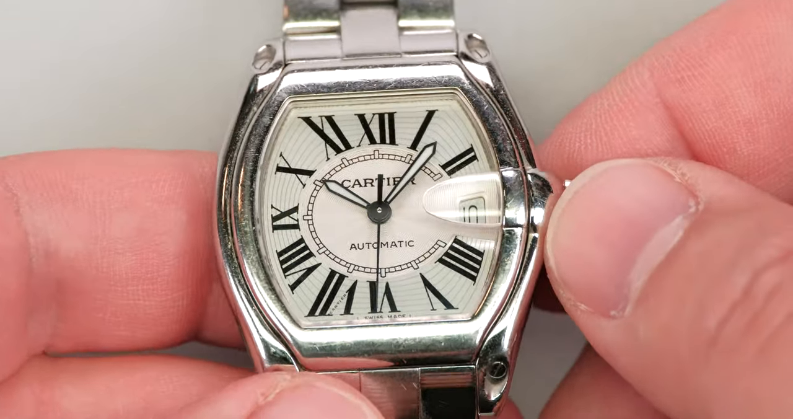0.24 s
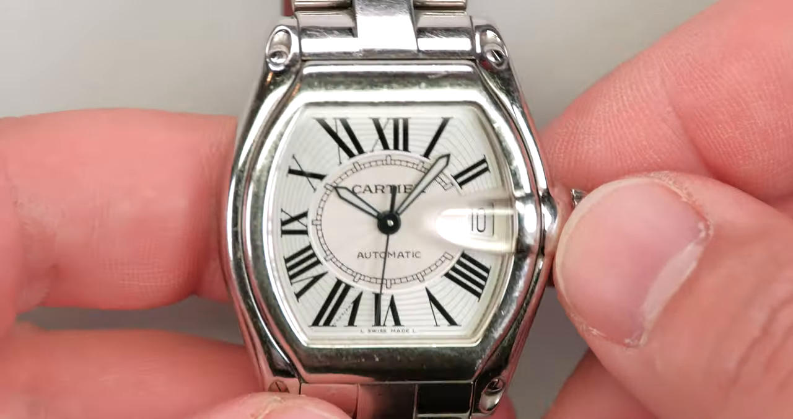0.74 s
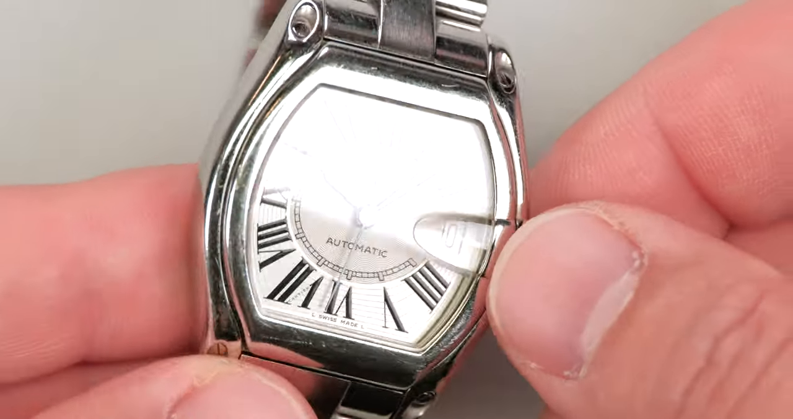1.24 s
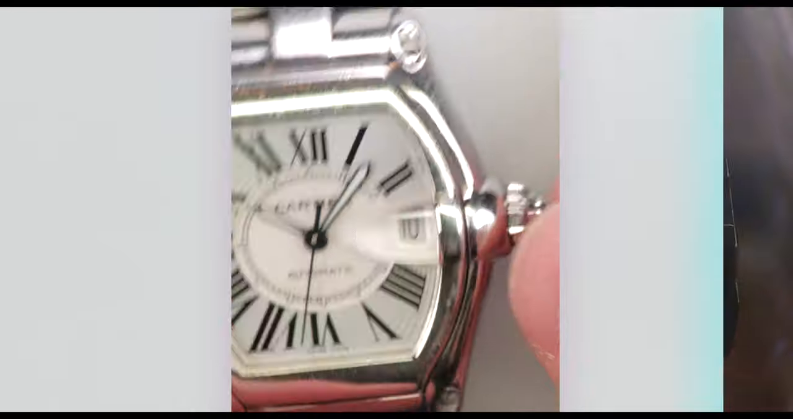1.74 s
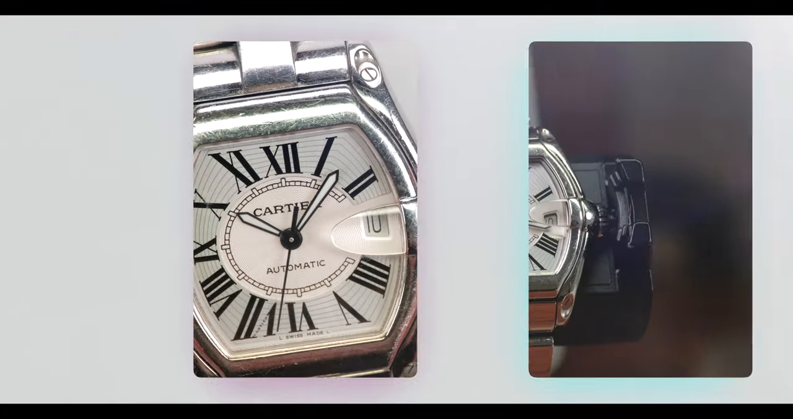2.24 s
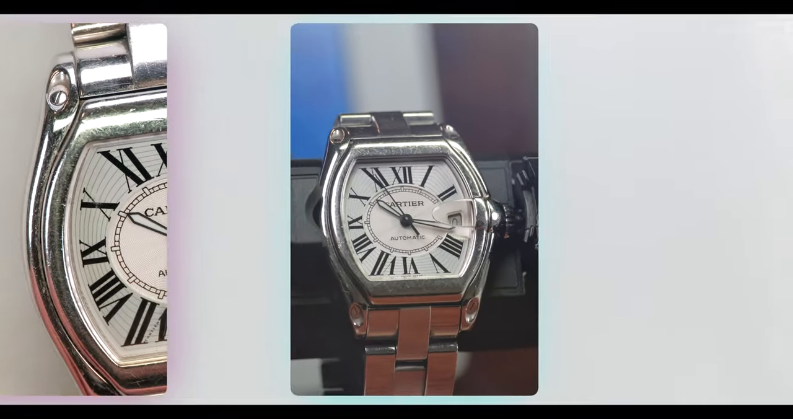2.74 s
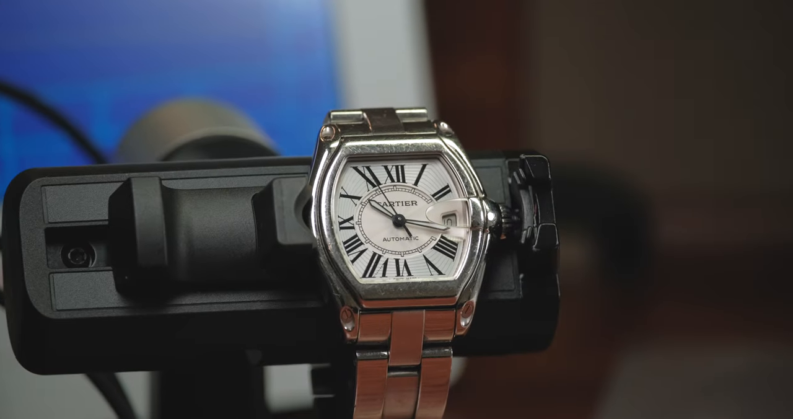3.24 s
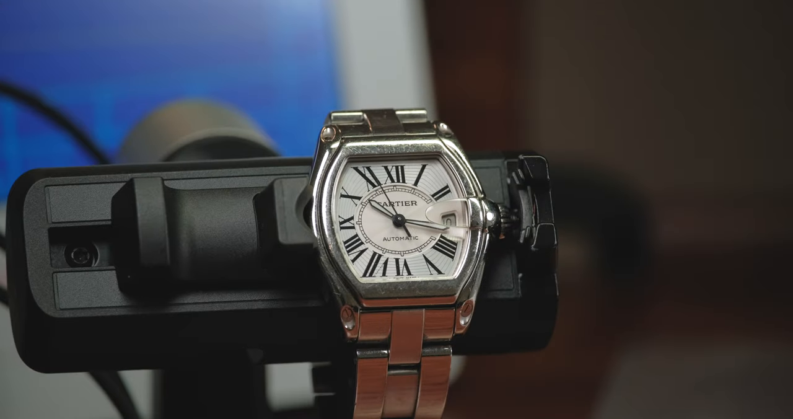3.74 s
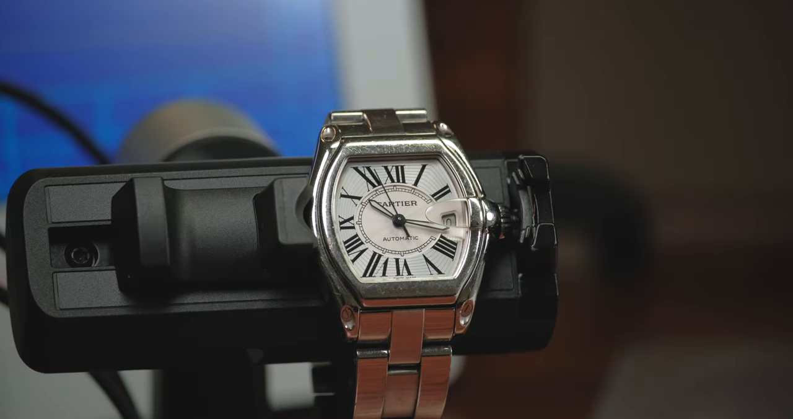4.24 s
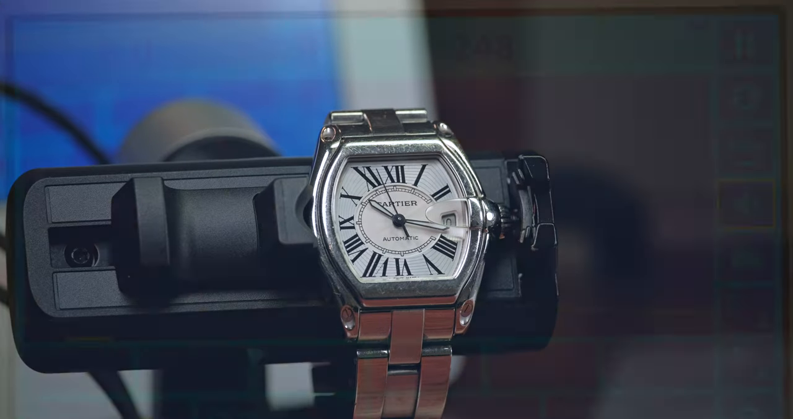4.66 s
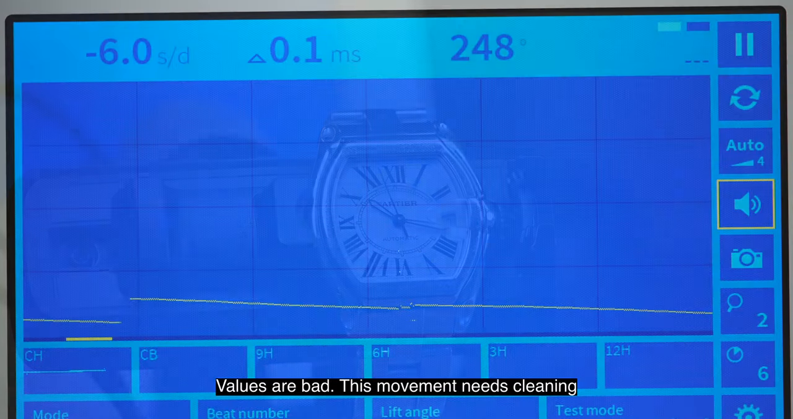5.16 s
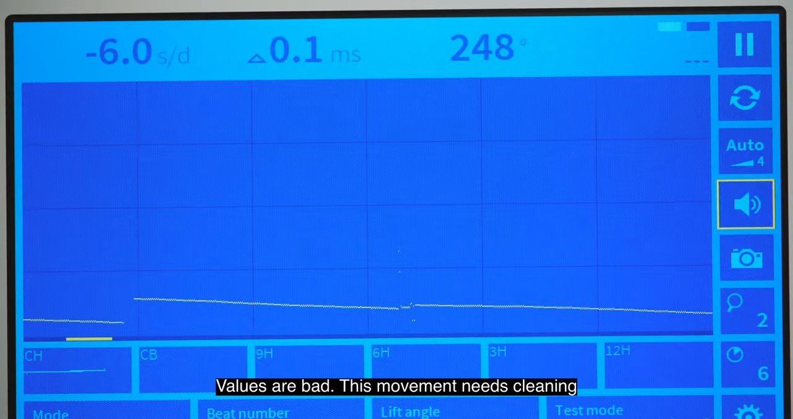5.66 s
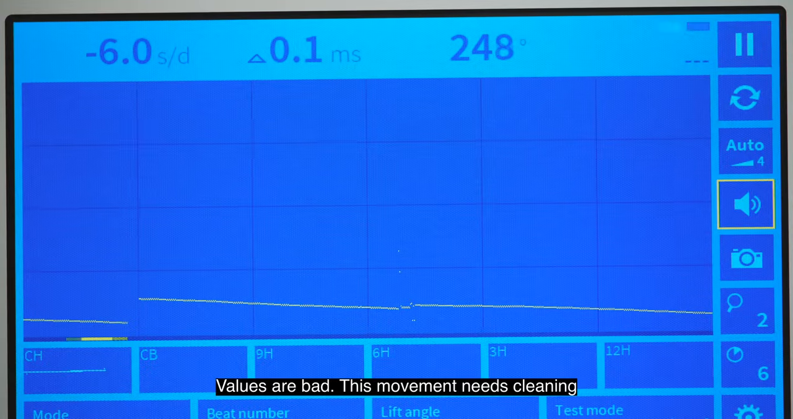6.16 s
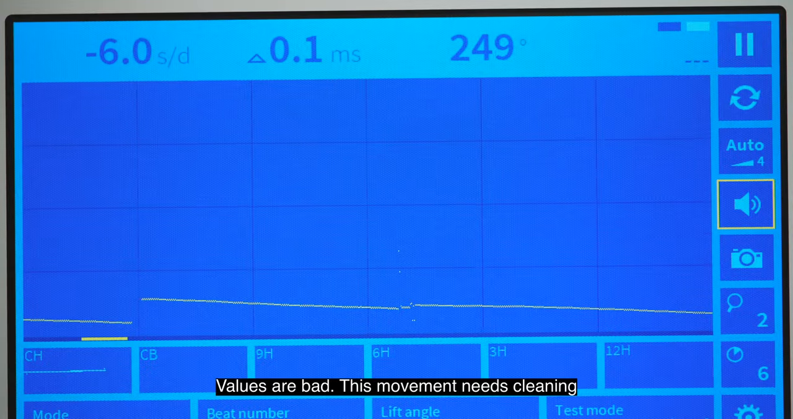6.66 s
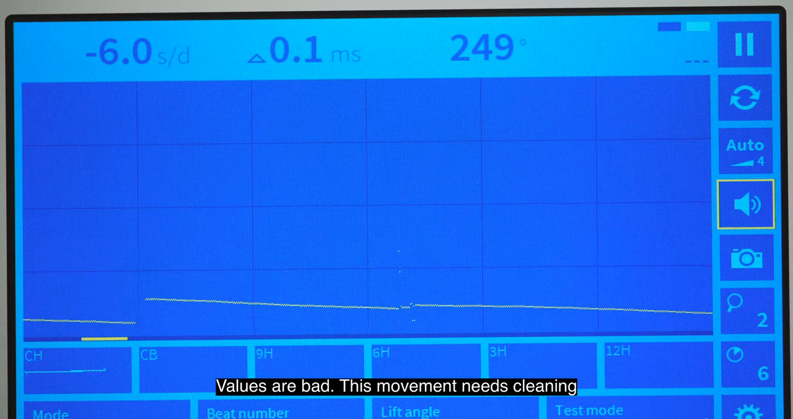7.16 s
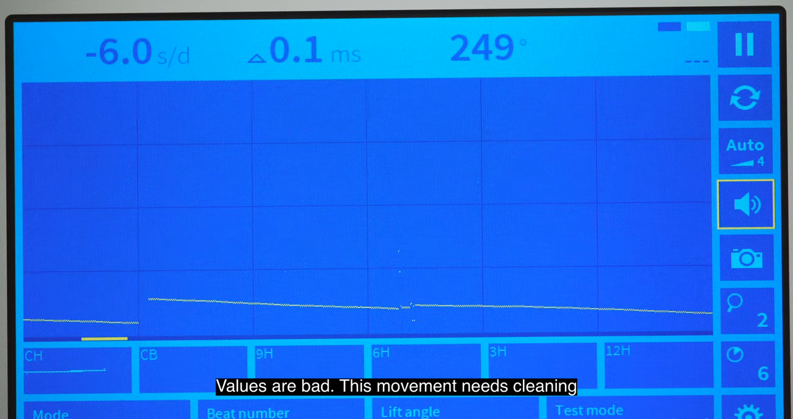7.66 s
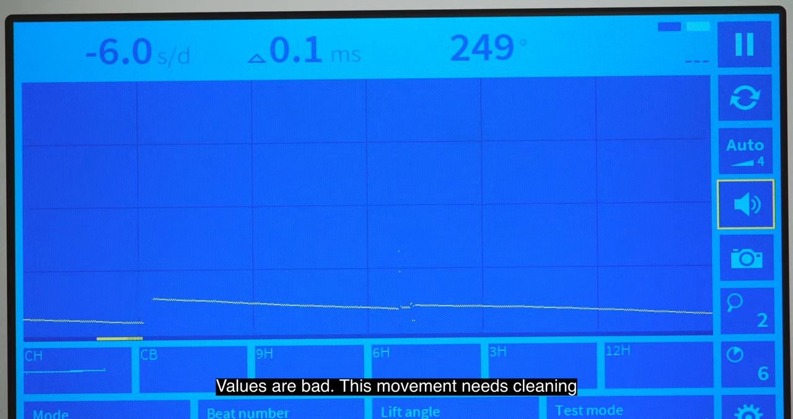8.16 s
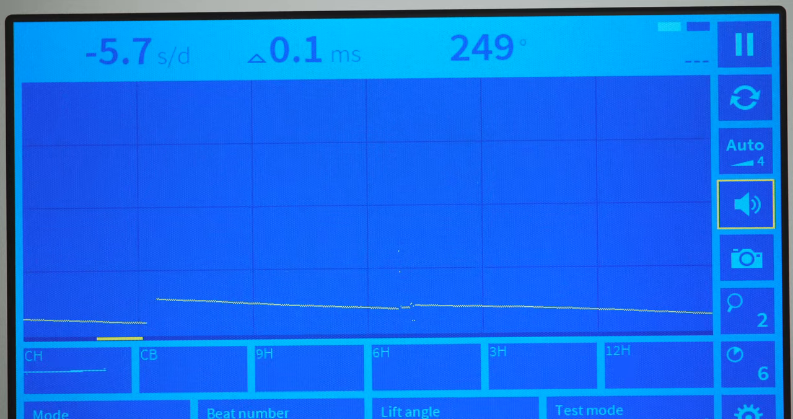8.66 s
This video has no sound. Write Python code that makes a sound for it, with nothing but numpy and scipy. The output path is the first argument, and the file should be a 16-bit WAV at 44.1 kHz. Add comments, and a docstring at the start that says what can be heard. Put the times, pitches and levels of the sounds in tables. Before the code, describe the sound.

A quiet room with soft hiss. At 0.5 s a small bright bracelet click, another fainter one at 0.75, then a faint low rub over a desk, swelling with a tiny creak around 1.2. Light clicks at 1.4 lead to a loud, sharp double clack at 1.56 and 1.63, hard plastic and metal with a woody low body, followed by a rapid rattle until 1.76 and a short room tail. From about 1.9 s tiny steel ticks fade in, fully present by 3: eight even beats a second, each a tight triple impact, with a ringing haze near 4.7 kHz. Around 4.7 to 4.9 s the stand is bumped, a dull, very deep knock that sways and dies over a second or two. The ticking crossfades to a closer, crisper version by 5.2 and runs unchanged to the end near 8.9, some beats harder, with faint hum and uneven subsonic rumble.

```python
"""Bracelet clicks, a slide over a desk and a snap into a holder: a watch is turned in the hands.
Two stretches of ticking then fade in, eight beats a second in a quiet room, the second from closer by.
Clacks are shaped noise bursts, ticks are dying steel modes and the slide is noise through desk modes.
The microphone stand is bumped and sways at a very low pitch; background noise and faint hum lie below."""
import sys
import numpy as np
from scipy import signal
from scipy.fft import rfft, irfft
from scipy.io import wavfile

SR = 44100
rng = np.random.default_rng(int(sys.argv[2]) if len(sys.argv) > 2 else 0)


def level_to_linear(level):
    """Convert decibel levels to linear amplitude factors, elementwise."""
    exponent = np.asarray(level, float) / 20
    return 10 ** exponent


def master(y):
    """Save y as 16-bit WAV."""
    cut = np.clip(np.atleast_2d(y).T, -1, 1)
    pcm = np.round(cut * 32767)  # scale
    wavfile.write(sys.argv[1], SR, pcm.astype(np.int16))


N = 393372

# Cross-fade of the stretches: hands, far watch, near watch. Each row: time in seconds, share 0-1.
FADES = [
    [(0, 0.44), (1.8, 0.52), (3, 0.1)],
    [(1.75, 0.03), (3.05, 0.93), (4.8, 0.87), (5.2, 0.06)],
    [(4.75, 0), (5.2, 0.94)],
]
# Upper edge of the background noise in each stretch: hands, far, near, in Hz.
HISS_EDGE_HZ = [14900, 15850, 15850]


def evened(x):
    """Scales to rms 1."""
    return x / np.sqrt(np.mean(x ** 2) + 1e-20)


def peaked(x):
    """Scales to peak 1."""
    return x / (abs(x).max() + 1e-20)


def read(points, hz):
    """Value of a spectrum table on a log-frequency axis."""
    f, value = np.transpose(points)
    return np.interp(np.log(hz + 1), np.log(f + 1), value)


def curve(rows, **ends):
    """A time table, sample by sample."""
    return np.interp(np.arange(N) / SR, *np.transpose(rows), **ends)


def add(mix, s, sound):
    """Mixes a sound in at a time in seconds."""
    part = mix[round(s * SR):][:len(sound)]
    part += sound[:len(part)]


def resonate(x, hz, width_hz):
    """One-pole complex resonance of about unit gain at its centre."""
    pole = np.exp((2j * np.pi * hz - np.pi * width_hz) / SR)
    return 2 * signal.lfilter([1 - abs(pole)], [1, -pole], x, axis=-1).real


def resonate_twice(x, hz, width_hz):
    """Two equal resonances in a row, for steeper skirts."""
    return resonate(resonate(x, hz, width_hz), hz, width_hz)


def ring(hz, db, t60_s, seconds, rise_s, scatter_db, detune):
    """Dying modes; each blow lands elsewhere, so their strengths, phases and pitches scatter."""
    t = np.arange(round(seconds * SR))[:, None] / SR
    phase, strength, pitch = rng.standard_normal((3, len(hz)))
    turns = hz * (1 + detune * pitch) * t + phase
    modes = level_to_linear(db + scatter_db * strength - 60 * t / t60_s) * np.sin(2 * np.pi * turns)
    return peaked(modes.sum(1) * (1 - np.exp(-t[:, 0] / rise_s)))


def tail(t60_at):
    """Diffuse room tail of energy 1: noise whose decay time depends on frequency."""
    hz, t, z = signal.stft(rng.standard_normal(SR), SR, nperseg=256)
    out = signal.istft(z * level_to_linear(-60 * t / t60_at(hz)[:, None]), SR, nperseg=256)[1]
    out[:200] = 0  # the first wall is some way off
    return out / np.linalg.norm(out)


def shaped_noise(spectrum, edge_hz):
    """Noise of rms 1 with a given spectrum and a sharp upper edge."""
    hz = np.fft.rfftfreq(N, 1 / SR)
    bins = rfft(rng.standard_normal(N)) * level_to_linear(read(spectrum, hz)) * (hz < edge_hz)
    return evened(irfft(bins, N))


def air():
    """Background as shaped noise, with faint hum, and in the later two stretches noise of opposite sign per ear."""
    # Background of each stretch: room and microphone noise, plus the watch's blurred ringing near 4.7 kHz.
    # Each row: frequency in Hz, relative density in dB per Hz.
    spectra = [
        [(18, -53), (30, 2), (103, -12.5), (215, -7.5), (404, -14), (540, -19.5), (780, -13), (1460, -21),
         (1590, -19.5), (2410, -26), (16000, -37.5)],
        [(18, -36.5), (30, -1), (507, -18), (926, -17.5), (2440, -20.5), (3250, -21.5), (4690, -10.5),
         (5210, -18.5), (5640, -25), (6600, -27), (15600, -27)],
        [(18, -31), (30, -4.5), (133, -9), (642, -18), (926, -14), (1000, -18.5), (2570, -21), (4450, -19.5),
         (5790, -23), (6770, -27), (15600, -27.5)],
    ]
    # Rms of each stretch's background at full share, in dB.
    noise_db = [-67, -64, -66]
    # Side noise of opposite sign per ear, hollowed out around 4-5.5 kHz.
    # Each row: frequency in Hz, relative density in dB per Hz.
    unlike = [(18, -22), (30, 1.5), (250, 3.5), (1980, -3.5), (3010, -5), (3700, -14), (4200, -34),
              (5500, -30), (6500, -4), (12700, -2), (15600, -5.5)]
    unlike_db = -74.3
    # Steady machines. Each row: frequency in Hz, rms at full share in dB, stretch 0-2.
    hum = [(42, -80, 1), (930.5, -88, 1), (930.5, -83, 2), (3230, -92, 2)]
    shares = [np.clip(curve(f), 0, 1) for f in FADES]
    out = np.zeros((2, N))
    for share, spectrum, db, edge_hz in zip(shares, spectra, noise_db, HISS_EDGE_HZ):
        out += share * level_to_linear(db) * shaped_noise(spectrum, edge_hz)
    for hz, db, stretch in hum:
        tone = evened(np.sin(2 * np.pi * hz * np.arange(N) / SR))
        out += shares[round(stretch)] * level_to_linear(db) * tone
    side = level_to_linear(unlike_db) * shaped_noise(unlike, HISS_EDGE_HZ[-1])
    return out + np.hypot(shares[1], shares[2]) ** 1.5 * side * [[1], [-1]]


def stand():
    """Knocks set the stand's modes swinging; a low rumble of uneven level trembles at the same pitch."""
    # Stand trembling with the floor. Each row: time in seconds, base level in dB.
    sway = [(1.8, -80), (2.6, -71), (4.6, -67.5), (5.5, -65), (5.9, -69), (8.92, -65.5)]
    # Moments when the low rumble happens to be stronger. Each row: centre in seconds, added level in dB.
    stronger = [(6.6, 2.7), (7.38, 8.4), (7.93, 3.5), (8.45, 7.5)]
    stronger_s = 0.16  # half width at 1/e
    # Knocks. Each row: start in seconds, peak in dB.
    bumps = [(4.69, -48), (4.80, -47.5), (4.884, -28.5)]
    # Modes of the stand. Each row: settled frequency in Hz, relative level in dB, t60 in seconds.
    stand_modes = [(19.7, -5, 2.3), (27.5, -7, .7), (66, -21, 1.1)]
    now = np.arange(N) / SR
    uneven_db = sum(db * np.exp(-((now - s) / stronger_s) ** 2) for s, db in stronger)
    rumble = evened(resonate_twice(rng.standard_normal(N), 19.7, 16.7))
    out = level_to_linear(curve(sway, left=-150) + uneven_db) * rumble
    t = np.arange(2 * SR) / SR
    # the first swing is faster, while the knuckle still pushes
    hurried = t + 0.022 * (1 - np.exp(-t / 0.018))
    # neighbouring modes start in opposite directions
    swing = sum((-1) ** k * level_to_linear(db - 60 * t / t60_s) * np.sin(2 * np.pi * hz * hurried)
                for k, (hz, db, t60_s) in enumerate(stand_modes))
    knock = peaked(swing * (1 - np.exp(-t / 0.014)))
    for s, db in bumps:
        add(out, s, level_to_linear(db) * knock)
    return out


def clacks(holder_modes):
    """Bracelet and holder: a bright crack, a short rattle in the jaw and the desk's low ring."""
    # Each row: start in seconds, peaks of jaw, desk ring and crack in dB, pitch of the struck part in Hz.
    clack_rows = [(0.4906, -49, -56, -37, 3200), (0.758, -51, -63, -45, 2840),
                  (1.1445, -63, -56.5, -56, 4580), (1.3965, -73, -52.5, -62, 2790),
                  (1.4321, -41, -49.5, -33, 4520), (1.449, -68, -51, -53, 2220),
                  (1.4885, -69, -65, -61, 2110), (1.504, -50, -66.5, -43, 3600),
                  (1.5586, -24, -29.5, -25, 3960), (1.5645, -32, -38, -29.5, 4940),
                  (1.5954, -51, -44, -48, 2690), (1.6288, -17, -23, -23, 2260),
                  (1.6447, -43, -43.5, -33, 3020), (1.6782, -29.5, -36, -30, 2350),
                  (1.6877, -35.5, -36.5, -30.5, 2800), (1.694, -50, -38.5, -37, 1500),
                  (1.7122, -58, -48.5, -35, 2780), (1.7276, -50, -41, -46, 2230),
                  (1.7393, -44, -46.5, -45, 1600), (1.7617, -52, -42, -46, 1800),
                  (1.9774, -62, -57, -54.5, 1500)]
    # Plastic jaw. Each row: frequency in Hz, width of each of two passes in Hz, relative level in dB.
    jaw_modes = [(1150, 1000, -11.5), (2230, 240, 6), (2670, 250, -10), (3280, 1000, 0.5),
                 (4740, 2200, -8.5)]
    out, t = np.zeros(N), np.arange(6000) / SR
    high = signal.butter(2, [5600, 15000], "band", fs=SR, output="sos")
    fade_out = signal.windows.tukey(2 * len(t), 0.3)[len(t):]
    for s, jaw_db, desk_db, crack_db, part_hz in clack_rows:
        crack, rattle, shove = rng.standard_normal((3, len(t)))
        crack = crack * (level_to_linear(-60 * t / 0.0039) + level_to_linear(-13 - 60 * t / 0.036))  # sharp tip, faint afterglow
        add(out, s, level_to_linear(crack_db) * peaked(signal.sosfilt(high, crack)))

        rattle = rattle * level_to_linear(-60 * t / 0.0073)
        jaw = -sum((-1) ** k * level_to_linear(db) * resonate_twice(rattle, hz, width_hz)
                   for k, (hz, width_hz, db) in enumerate(jaw_modes))
        jaw = peaked(jaw) + 0.94 * peaked(resonate_twice(rattle, part_hz, 1400))
        add(out, s + 0.0007, level_to_linear(jaw_db) * peaked(jaw))

        shove = shove * level_to_linear(-60 * t / 0.021)
        desk = sum(level_to_linear(db) * np.sqrt(t60_s) * resonate(shove, hz, 2.1 / t60_s)
                   for hz, db, t60_s in holder_modes)
        add(out, s + 0.00079, level_to_linear(desk_db) * peaked(desk) * fade_out)
    return out


def slide(holder_modes):
    """The case rubs on the desk: noise through three desk modes, with one creak of stick and slip."""
    # Rub. Each row: time in seconds, rms in dB.
    slide_rows = [(.76, -87), (.81, -70.5), (1.05, -75.5), (1.18, -68.5), (1.24, -60), (1.3, -66),
                  (1.39, -81), (1.55, -59.5)]
    creak_s, creak_db, rise_db_per_s, fall_db_per_s = 1.235, -72, 140, 110
    rub = rng.standard_normal(N)
    drone = sum(level_to_linear(db) * evened(resonate(rub, hz, 4.1 / t60_s)) for hz, db, t60_s in holder_modes[2:5])
    slips = (rng.random(N) < 160 / SR) * level_to_linear(3.6 * rng.standard_normal(N))  # uneven, about 160 a second
    creak = resonate_twice(slips, 2300, 900) + resonate(resonate(slips, 3200, 700), 3400, 700)
    since = np.arange(N) / SR - creak_s
    below_db = np.maximum(-rise_db_per_s * since, fall_db_per_s * since)
    out = level_to_linear(curve(slide_rows, left=-150, right=-150)) * evened(drone)
    return out + level_to_linear(creak_db - below_db) * evened(creak)


def handling():
    """Clacks and slide excite the room, most strongly near 3 kHz and low down."""
    # Holder and desk. Each row: frequency in Hz, relative level in dB, nominal t60 in seconds.
    holder_modes = [(65, -11, 0.22), (127.9, -5, 0.048), (205, 3.5, 0.1), (262, -7.5, 0.044),
                    (350, -5, 0.042), (460, 1.5, 0.051), (554, -15.5, 0.033), (740, -10, 0.046),
                    (920, -4.5, 0.041)]
    # Room decay. Each row: frequency in Hz, t60 in seconds.
    room = [(150, 0.92), (400, 0.63), (1040, 0.85), (2760, 0.7), (7280, 0.38), (15000, 0.26)]
    dry = clacks(holder_modes) + slide(holder_modes)
    sent = 0.71 * resonate(dry, 3300, 2600) + 0.72 * resonate(dry, 300, 600) + 0.45 * dry
    return dry + level_to_linear(-15) * signal.fftconvolve(sent, tail(lambda hz: read(room, hz)))[:N]


def watch(far_or_near):
    """Three tiny steel impacts a beat ring the movement; the room holds on to the case's main band."""
    # Movement and case. Each row: frequency in Hz, relative level far and near in dB, t60 in seconds.
    watch_modes = [(1214, -19.5, -17.5, 0.044), (1612, -20.5, -23, 0.058), (1908, -14, -15, 0.038),
                   (2265, -22, -20.5, 0.054), (2858, -18.5, -15.5, 0.047), (3170, -19, -23, 0.056),
                   (3457, -18, -3, 0.013), (3762, 3.5, -7, 0.011), (4093, -8, 3, 0.013),
                   (4415, 6.5, -4.5, 0.0082), (4500, -13, -2.5, 0.021), (4616, 2, -4.5, 0.025),
                   (4853, 2, -4.5, 0.028), (5014, -32, 1.5, 0.023), (5236, -9, -2, 0.021),
                   (5550, 1.5, 2, 0.018), (5785, -9, -2, 0.016), (6014, -13, -5, 0.012),
                   (10250, -3, -1, 0.018), (12750, 2, -8, .022), (12980, 1, 5, 0.022),
                   (13330, -9, -1, 0.022), (14180, -5, 6, 0.019), (15160, -1, 4, 0.019),
                   (15680, -6, -8, .016)]
    # Delays of unlocking, impulse and drop inside a beat, in seconds.
    steps_s = [0, 0.0034, .0088]
    # Alternating pallets, far then near. Each row: unlocking, impulse, drop, top ring, peaks in dB.
    pallets = [
        [(-49.5, -44.5, -42, -65.5), (-48, -45.5, -41.5, -61.5)],
        [(-52, -43, -41, -58.5), (-47.5, -45.5, -41, -55.5)],
    ]
    # Start and end of the beats, far then near, in seconds.
    first_beat_s = [1.8653, 4.9005]
    last_beat_s = [5.0, 8.91]
    # Beats with a harder drop, far then near, counted from 0 in each stretch.
    hard_beats = [
        [7, 9, 11, 15, 20, 23],
        [5, 6, 13, 14, 15, 20, 22, 23, 26, 27, 29, 30],
    ]
    # Lingering bands, far then near. Each row: frequency in Hz, width of each of two passes in Hz, level in dB.
    linger = [
        [(4730, 540, -1), (5340, 800, -3), (3800, 290, -9)],
        [(4350, 570, 4.5), (5560, 500, -6.5), (3760, 270, 3)],
    ]
    # Level in dB and t60 in seconds of the lingering sound, far then near.
    linger_db = [0.5, -1.6]
    linger_t60_s = [0.6, 0.81]
    beat_s = 0.12503  # eight a second, a little slow
    hard_db, early_scatter_db, drop_scatter_db = 3, 1.5, 0.64
    snap_db, snap_hz, snap_width_hz = -16.5, 8500, 6000  # bare click of steel on jewel, under the ring
    top_hz = 8000

    hz, *levels, t60_s = np.transpose(watch_modes)
    db, top = levels[far_or_near], hz > top_hz
    low_modes = hz[~top], db[~top], t60_s[~top]
    top_modes = hz[top], db[top], t60_s[top]
    scatter_db = np.array([early_scatter_db, early_scatter_db, drop_scatter_db, early_scatter_db])
    dry = np.zeros((4, N))  # beats in rotation, so that neighbours echo unalike
    for k, s in enumerate(np.arange(first_beat_s[far_or_near], last_beat_s[far_or_near], beat_s)):
        share = np.clip(np.interp(s, *np.transpose(FADES[far_or_near + 1])), 0, 1)
        *blows_db, top_db = pallets[far_or_near][k % 2] + scatter_db * rng.standard_normal(4)
        blows_db[-1] += hard_db * (k in hard_beats[far_or_near])
        for late_s, blow_db in zip(steps_s, blows_db):
            body = ring(*low_modes, 0.05, 0.00044, 3.1, 0.0098)
            add(dry[k % 4], s + late_s, share * level_to_linear(blow_db) * body)
            snap = rng.standard_normal(80) * np.exp(-np.arange(80) / 12)
            snap = peaked(resonate_twice(snap, snap_hz, snap_width_hz))
            add(dry[k % 4], s + late_s, share * level_to_linear(blow_db + snap_db) * snap)
            top_ring = ring(*top_modes, 0.03, 0.00043, 3.1, 0.011)
            add(dry[k % 4], s + late_s, share * level_to_linear(top_db) * top_ring)
    rooms = np.array([tail(lambda f: linger_t60_s[far_or_near] + 0 * f) for part in dry])
    held = sum(level_to_linear(d) * resonate_twice(rooms, f, width_hz) for f, width_hz, d in linger[far_or_near])
    echo = signal.fftconvolve(dry, held, axes=1)[:, :N]
    return (dry + level_to_linear(linger_db[far_or_near]) * echo).sum(0)


def scene():
    """Hands and holder, then the two stretches of ticking, over stand and background."""
    ear_lag_s = 3.8e-6  # the ticks reach one side a little sooner
    low_pass = signal.butter(10, HISS_EDGE_HZ[-1], fs=SR, output="sos")
    ticks = signal.sosfilt(low_pass, watch(0) + watch(1))
    lead = ear_lag_s * SR / 2 * np.gradient(ticks)
    return air() + stand() + handling() + ticks + lead * [[1], [-1]]


def top_cut(x):
    """Nothing passes above the cut-off."""
    return signal.sosfilt(signal.butter(12, 16850, fs=SR, output="sos"), x)


def record(dry):
    """Limits the band with a steep linear-phase low-pass at 16.5 kHz."""
    edge = signal.firwin(401, 16500, window=("kaiser", 9), fs=SR)
    mix = signal.oaconvolve(dry, edge[None], "same")
    return top_cut(mix)


dry = scene()
out = record(dry)
master(out)
```